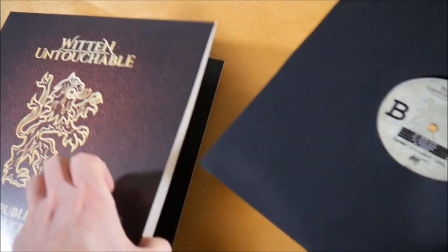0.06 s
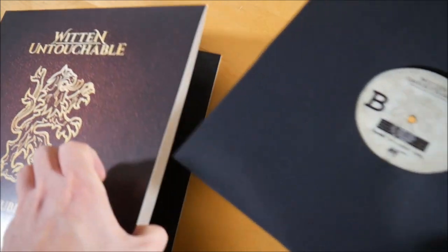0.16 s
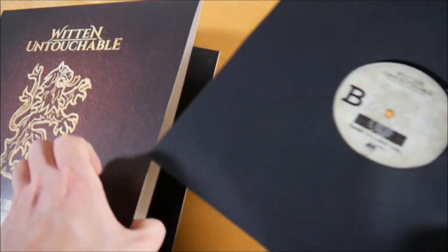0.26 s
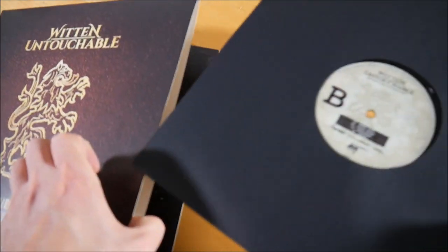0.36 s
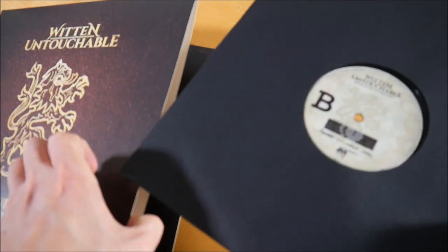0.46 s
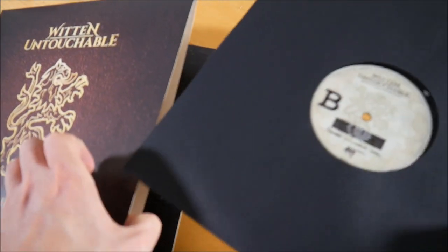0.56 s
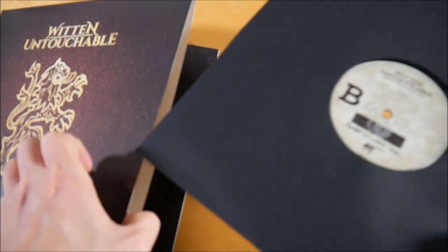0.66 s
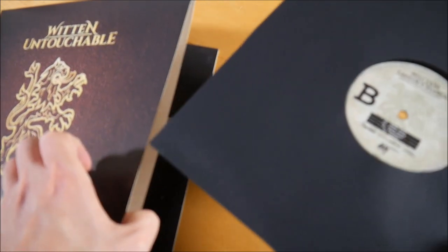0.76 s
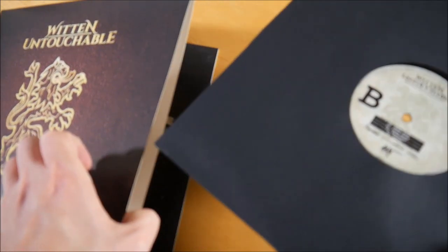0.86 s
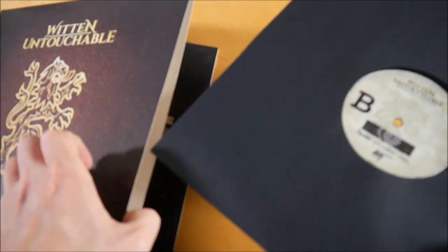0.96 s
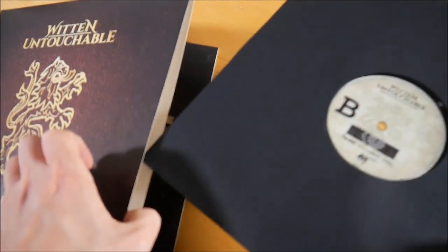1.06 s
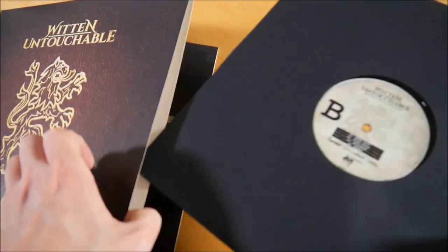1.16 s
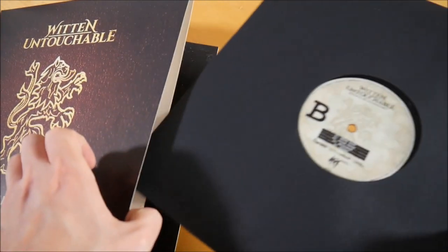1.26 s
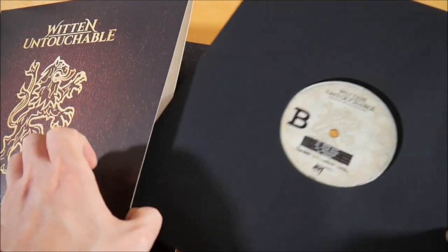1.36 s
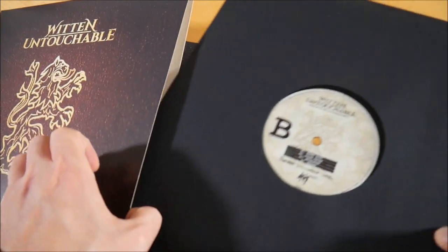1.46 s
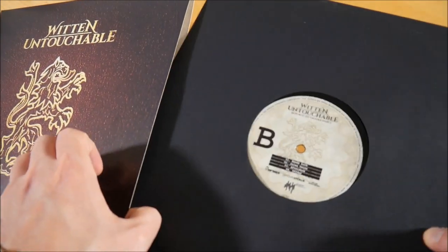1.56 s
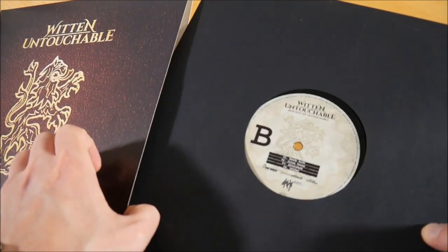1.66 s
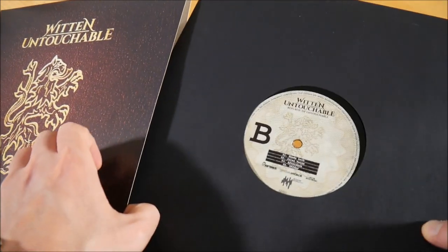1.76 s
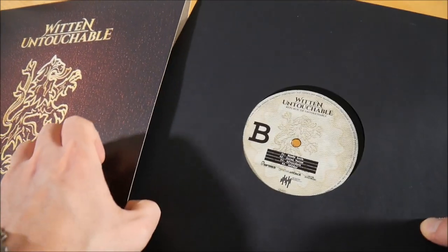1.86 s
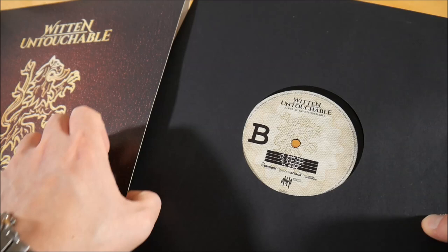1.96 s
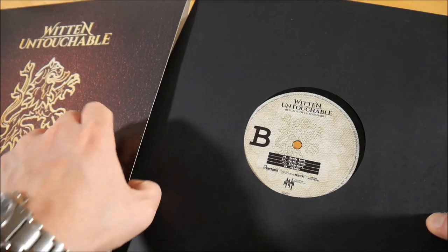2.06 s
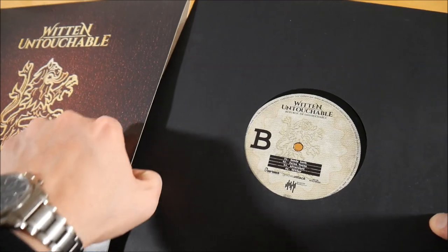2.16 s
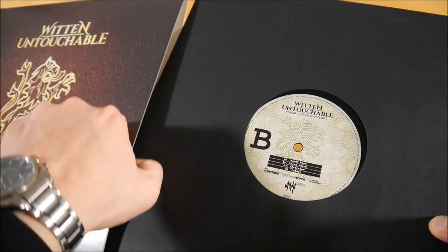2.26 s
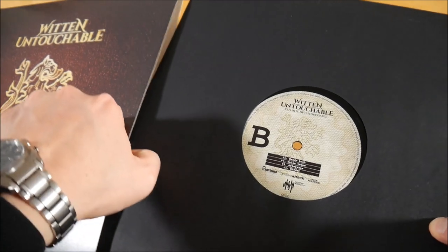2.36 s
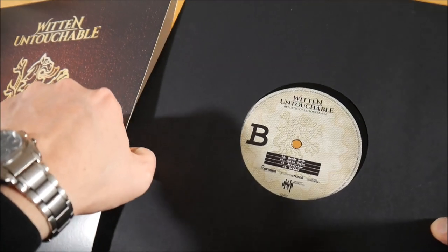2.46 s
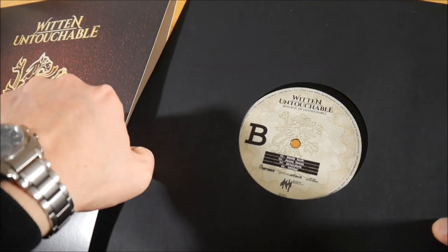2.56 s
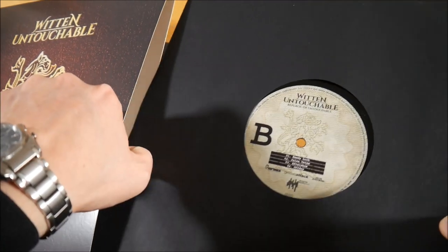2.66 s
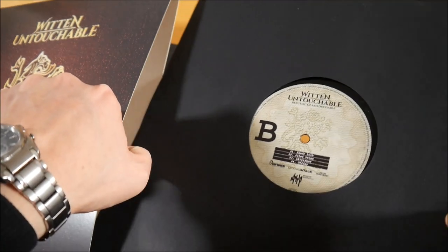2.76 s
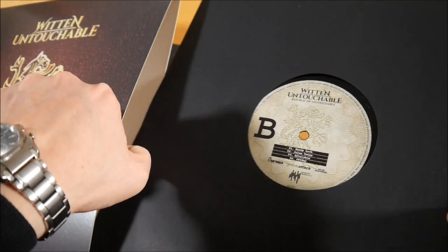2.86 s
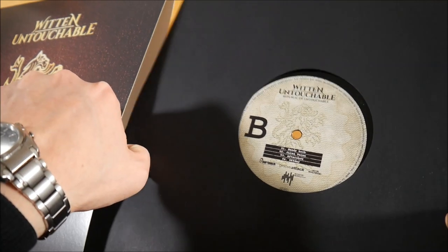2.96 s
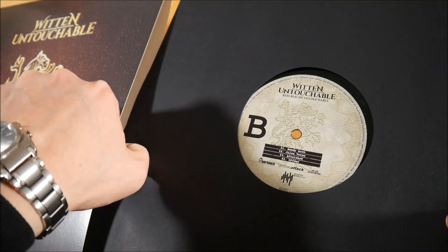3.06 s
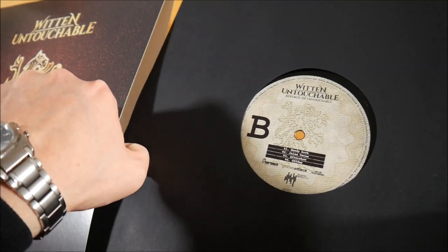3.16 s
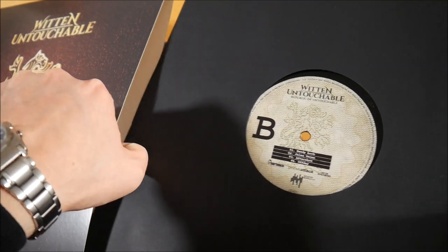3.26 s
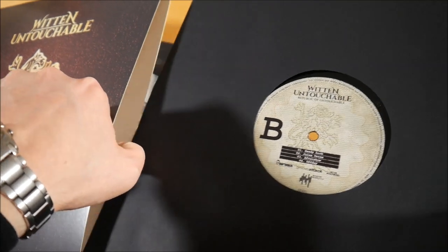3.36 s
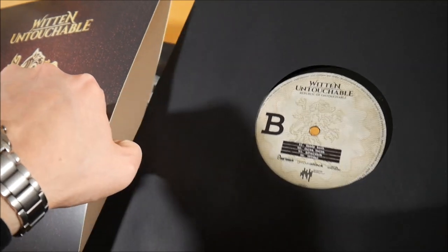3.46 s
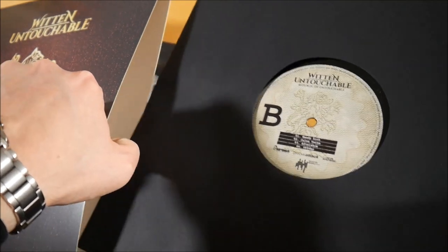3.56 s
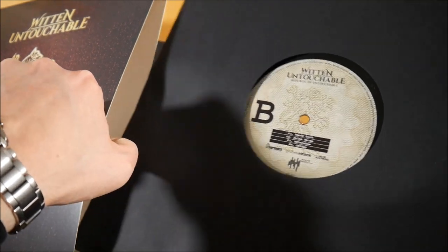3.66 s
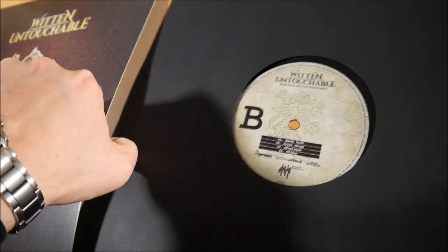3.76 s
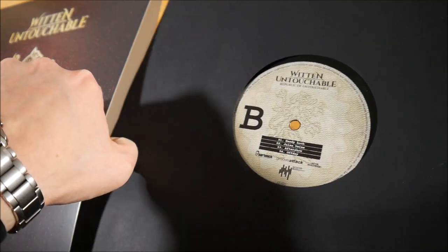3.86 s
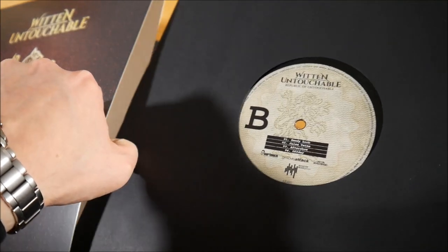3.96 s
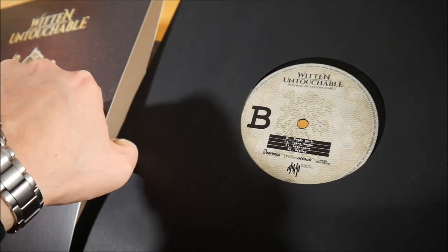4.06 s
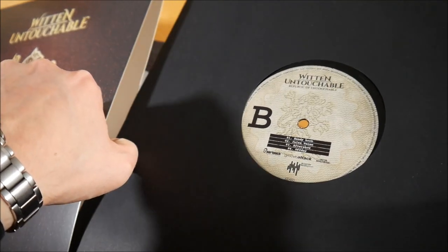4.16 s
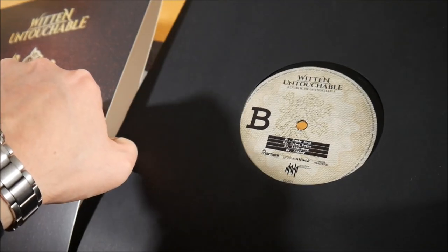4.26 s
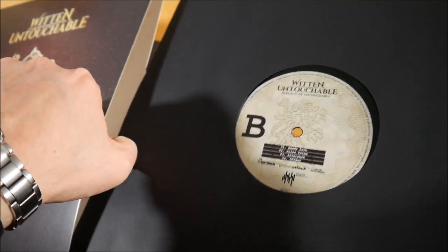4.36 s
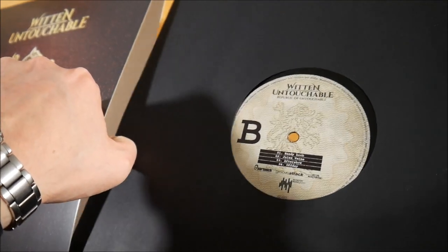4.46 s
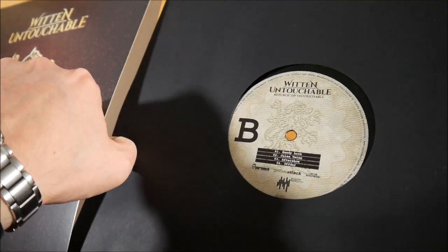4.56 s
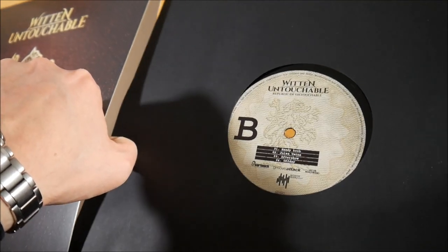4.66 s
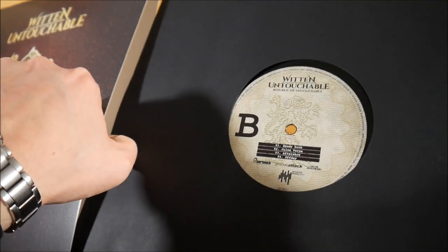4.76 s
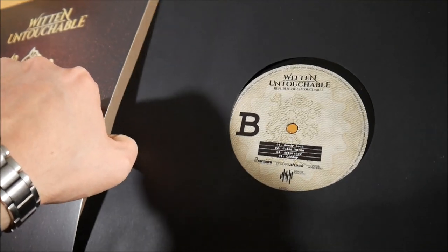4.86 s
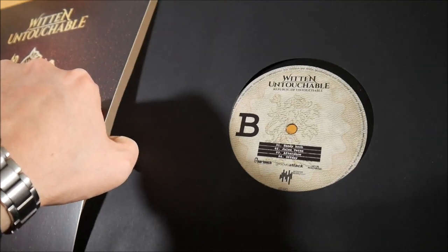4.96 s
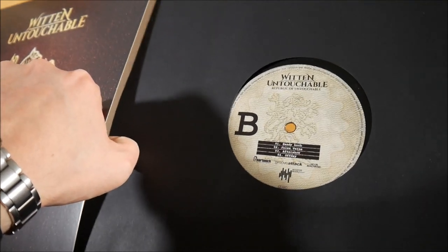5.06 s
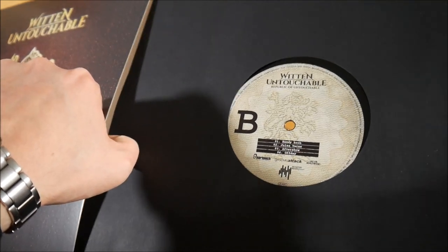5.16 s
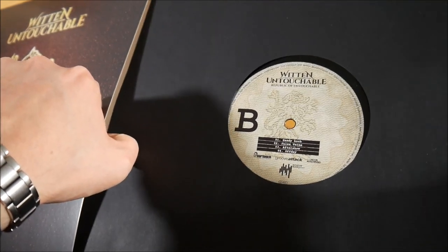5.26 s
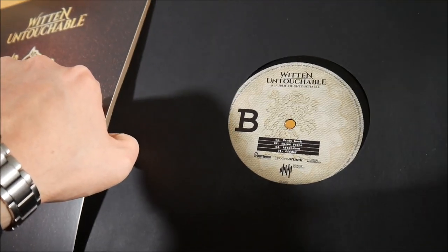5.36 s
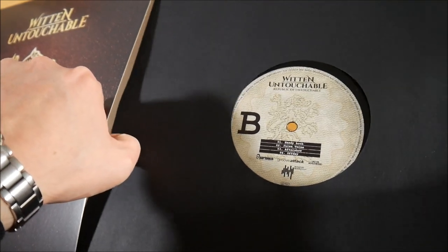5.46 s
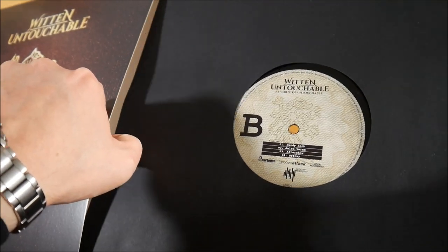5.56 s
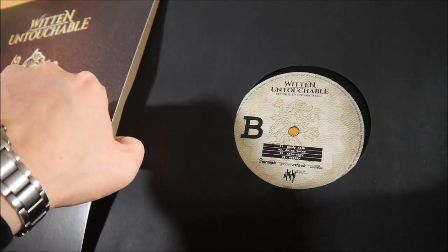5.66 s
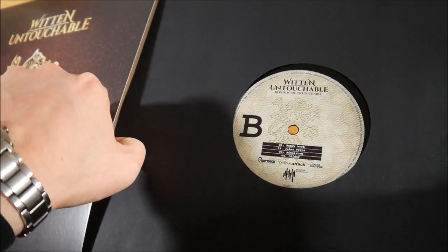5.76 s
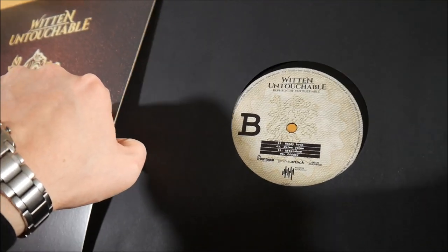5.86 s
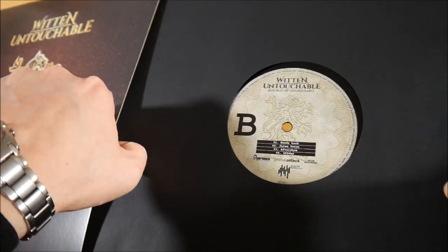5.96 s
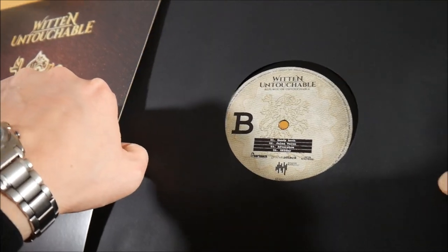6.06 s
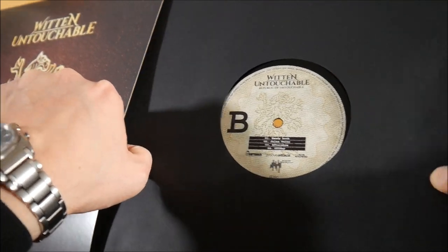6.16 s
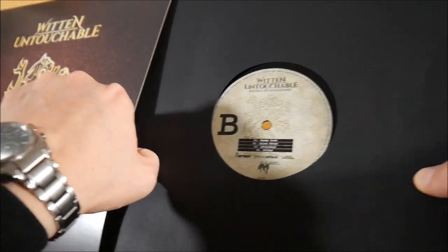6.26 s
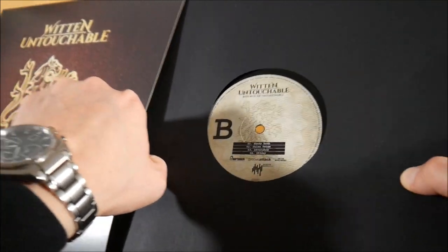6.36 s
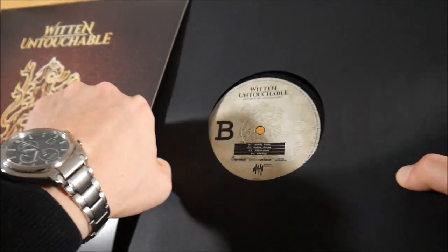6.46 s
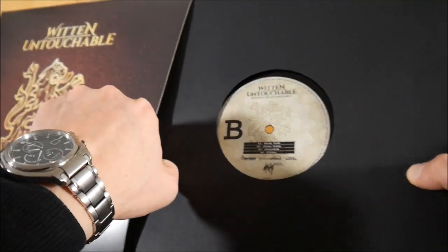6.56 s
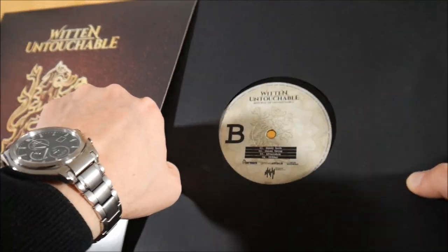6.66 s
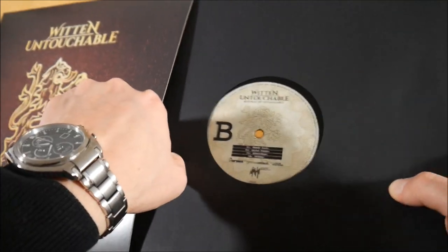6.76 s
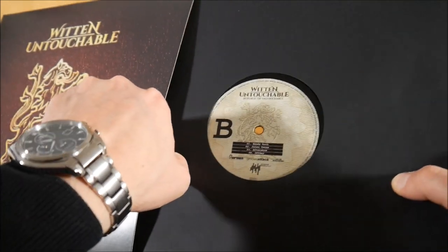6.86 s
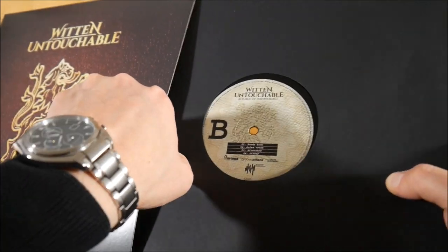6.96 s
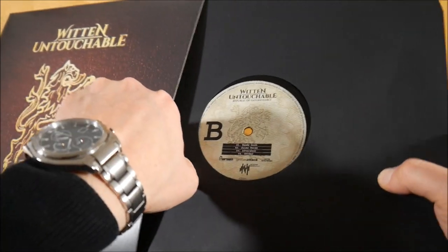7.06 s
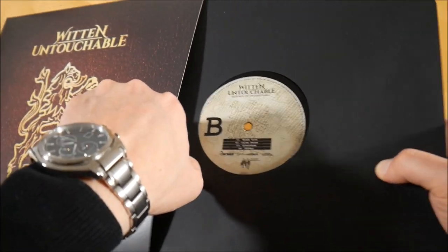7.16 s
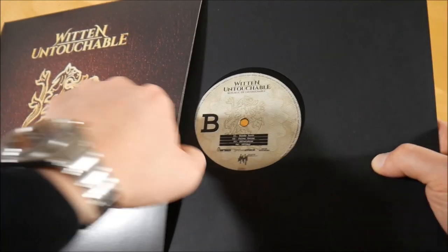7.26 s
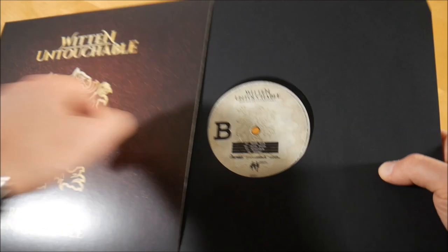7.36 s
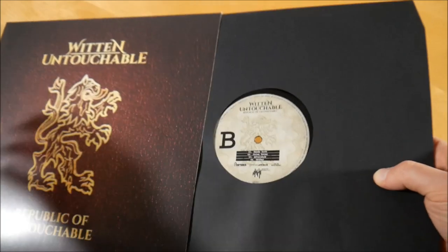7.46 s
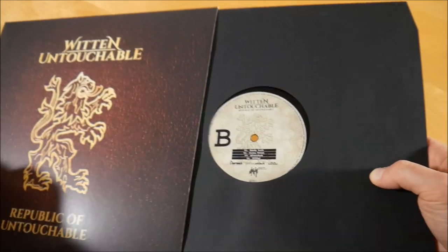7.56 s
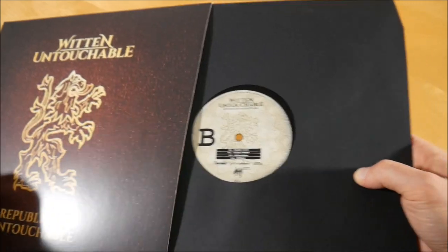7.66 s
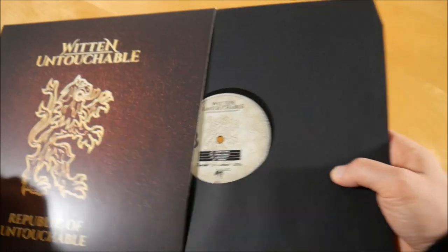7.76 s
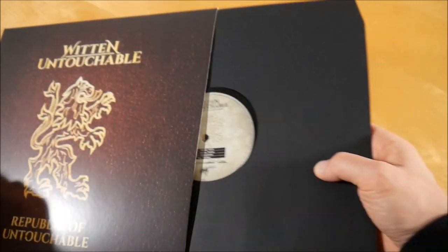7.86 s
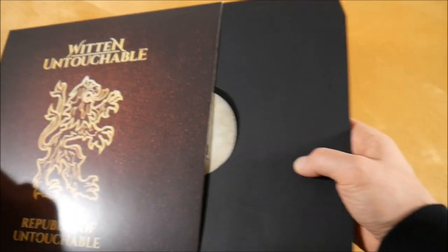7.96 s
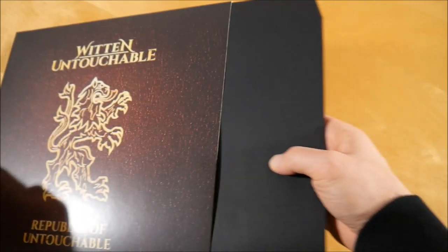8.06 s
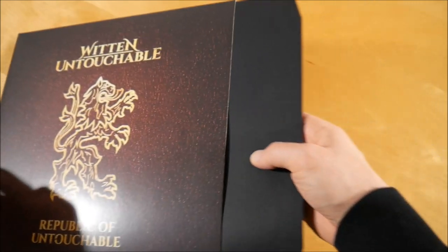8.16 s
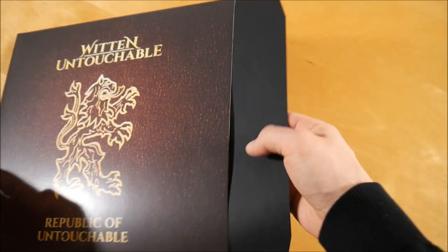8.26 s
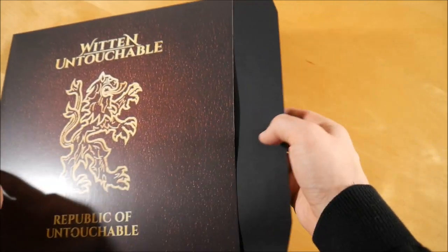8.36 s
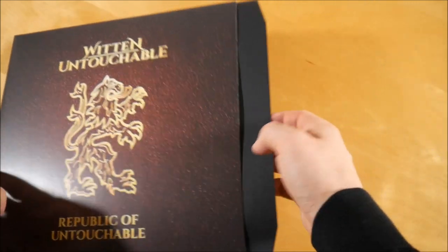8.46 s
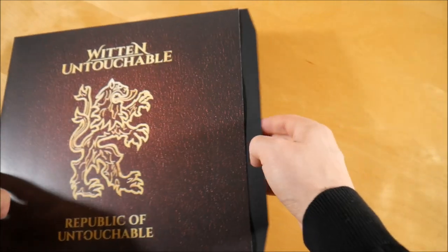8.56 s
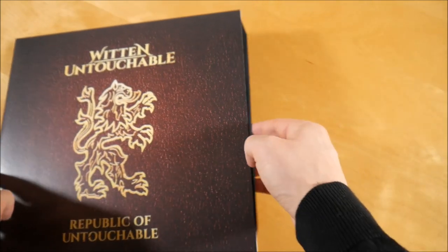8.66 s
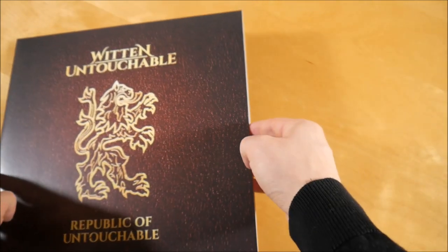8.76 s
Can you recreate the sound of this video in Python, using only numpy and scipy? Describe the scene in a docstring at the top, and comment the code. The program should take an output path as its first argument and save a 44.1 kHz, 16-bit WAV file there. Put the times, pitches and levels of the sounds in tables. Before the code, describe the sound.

Paper scuffs and rustles against cardboard with small taps and ticks, ending in a longer hissing slide as a record slips into its jacket.

```python
"""Paper scuffs in short pushes at the mouth of a cardboard jacket: a record in its inner sleeve is being
worked in on a wooden table. The stiff card knocks and ticks as it is held open, then the sleeve slides
home in one long stroke. Catching fibres make the hiss and drum on the card, the gap adds a hollow note,
creases snap, and knocks ring the jacket and disc. Behind it a small room hums and a tiny mechanism
patters faintly."""
import sys
import numpy as np
from scipy import signal
from scipy.fft import rfft, irfft
from scipy.io import wavfile
from scipy.ndimage import uniform_filter1d

SR = 44100
rng = np.random.default_rng(int(sys.argv[2]) if len(sys.argv) > 2 else 0)


def unload_wav(signal):
    """Save mono or channel-first audio to the path in sys.argv[1] as 16-bit WAV at rate SR, clipped to [-1, 1]."""
    wavfile.write(
        sys.argv[1],
        SR,
        np.round(np.clip(np.atleast_2d(signal).T, -1, 1) * 32767).astype(np.int16),
    )


N = 388080


def gain_of(db):
    """Decibels to amplitude."""
    return 10 ** (np.asarray(db) / 20)


def unit_rms(x):
    """Scales a signal to rms 1."""
    return x / np.sqrt(np.mean(x ** 2) + 1e-20)


def curve_at(points, hz):
    """Reads a curve of (Hz, value) points on a log-frequency axis."""
    f, value = np.transpose(points)
    return np.interp(np.log(hz + 1), np.log(f + 1), value)


def follow(rows, t):
    """Reads each column of an automation curve at times t."""
    times, *columns = np.transpose(rows)
    return [np.interp(t, times, column) for column in columns]


def add(mix, start_s, sound):
    """Mixes a sound in at its start time."""
    part = mix[round(start_s * SR):][:len(sound)]
    part += sound[:len(part)]


def coloured(x, points):
    """Filters by an EQ curve, to rms 1."""
    return unit_rms(irfft(rfft(x) * gain_of(curve_at(points, np.fft.rfftfreq(N, 1 / SR))), N))


def sharpest_pulse(gain):
    """The minimum-phase pulse with this spectral shape."""
    log_gain = np.log(np.maximum(gain / gain.max(), 1e-5))
    mirrored = np.concatenate([log_gain, log_gain[-2:0:-1]])
    return np.fft.ifft(np.exp(np.conj(signal.hilbert(mirrored)))).real


def wander(per_s):
    """A random drift of rms 1 that takes a new heading per_s times a second."""
    knots = rng.standard_normal(8192)
    return unit_rms(np.interp(np.arange(N) / SR * per_s, np.arange(len(knots)), knots))


def hand_motion(t):
    """Pushes, then the slide home. Returns hiss dB, drumming dB, treble tilt, note Hz and note lift dB."""
    # The hand's pushes. Each row: start, rise and length in seconds; hiss, swell over the push and
    # drumming in dB; treble tilt in dB per octave; the gap's note in Hz; its lift in dB.
    pushes = [(0, 0.0012, 0.3, -61, -2, -67, -1, 2240, 1.5),
              (0.475, 0.0036, 0.062, -43.5, 0, -50, 1.5, 3600, 1.5),
              (0.574, 0.045, 0.023, -46, 4.5, -54, 1.8, 3950, 2),
              (1.238, 0.0088, 0.056, -45.5, -3.5, -61.5, -2, 3900, 3.5),
              (1.354, 0.0067, 0.059, -41, -3, -58.5, 0, 4450, 9),
              (1.396, 0.012, 0.1, -37.5, 1, -57, -1, 4940, 2.5),
              (1.496, 0.038, 0.088, -40.5, 2, -52.5, -2, 2660, 6.5),
              (1.593, 0.038, 0.053, -36.5, 2, -42, -1, 2480, 4),
              (1.901, 0.12, 0.35, -47.5, -4, -49.5, 0.5, 2530, 2),
              (2.266, 0.034, 0.14, -60, 4, -67, 1.5, 2900, 1.5),
              (2.691, 0.045, 0.076, -45, 2, -45, -1, 2770, 3),
              (2.775, .03, 0.19, -52, -3.5, -57, -1, 2920, 1.5),
              (2.965, 0.038, 0.11, -47, -6, -57, -0.5, 3100, 1),
              (3.26, 0.012, 0.18, -50.5, 12.5, -53.5, 0.5, 2670, 4.5),
              (3.507, 0.11, 0.14, -42.5, 3.5, -54, 0.5, 3400, 7),
              (3.658, 0.13, 0.22, -44, -7.5, -47.5, -0.5, 3200, 5),
              (3.934, 0.08, 0.13, -50, -7.5, -52.5, -0.5, 4050, 4.5),
              (4.359, 0.079, 0.18, -49.5, -10, -54, 0.5, 4120, 3.5),
              (5.769, 0.004, 0.018, -54.5, -11, -56, -2, 4100, 0),
              (5.979, 0.0066, 0.12, -46.5, 2.5, -54.5, 2.5, 3400, 6.5),
              (6.094, 0.028, 0.16, -45.5, 0, -46, -1.5, 4000, 6.5),
              (6.226, 0.066, 0.19, -38.5, -0.5, -48.5, -1, 4040, 9),
              (6.436, 0.021, 0.023, -40.5, 0, -47.5, -1.5, 2680, 3),
              (6.497, 0.018, 0.055, -58, -4, -51, -3, 3400, 7),
              (6.589, 0.012, 0.072, -52, 5.5, -44.5, -3, 4000, -5),
              (6.786, 0.0045, 0.08, -43, 7, -49.5, -1.5, 4030, 5.5),
              (6.922, 0.072, 0.26, -44.5, 7, -51, -2, 4070, 4),
              (7.218, 0.062, 0.083, -39, 1.5, -53, -2, 4000, 8),
              (7.3, 0.011, 0.16, -50.5, -10, -50.5, -1.5, 4100, -6),
              (7.507, 0.0023, 0.026, -36.5, -10.5, -35, -5, 4300, 4),
              (7.624, 0.15, 0.27, -41, 11, -53, -0.5, 4060, 3.5)]
    # The long slide. Each row: time in seconds, hiss in dB, drumming in dB, treble tilt in dB per
    # octave, lift of the pocket's note in dB.
    slide = [(7.9, -45, -57, -2.5, -1), (8.02, -42, -52, 1, 4), (8.08, -35, -52, 3, 10),
             (8.13, -35.5, -59, 0, 1), (8.27, -33.5, -53, 2, 7.5), (8.35, -38.5, -45.5, -3.5, -2),
             (8.44, -46, -60, -1.5, 11), (8.56, -36.5, -49, -0.5, 0.5), (8.63, -41.5, -54, -1.2, 8.5),
             (8.69, -38.5, -54, -0.4, 0), (8.8, -38, -49, -5.5, -2)]
    release_db_per_s = 255
    pocket_start_hz, air_column_growth_per_s = 2040, 0.61
    hold_hiss_db, hold_drum_db = -70, -68
    strokes = []
    for start, rise, length, hiss_db, swell_db, drum_db, tilt, note_hz, lift_db in pushes:
        age = t - start
        shape_db = 20 * np.log10(np.clip(age / rise, 1e-5, 1))
        shape_db += swell_db * (np.clip(age / length, 0, 1) - .5)
        shape_db -= release_db_per_s * np.maximum(age - length, 0)
        strokes.append((hiss_db + shape_db, drum_db + shape_db, tilt, note_hz, lift_db))
    age = t - slide[0][0]
    hiss_db, drum_db, tilt, lift_db = follow(slide, t)
    gate_db = np.where(age > 0, 0, -np.inf)
    sinking_hz = pocket_start_hz / (1 + air_column_growth_per_s * np.maximum(age, 0))
    strokes.append((hiss_db + gate_db, drum_db + gate_db, tilt, sinking_hz, lift_db))
    hiss_dbs, drum_dbs, *colours = zip(*strokes)
    holding = (t > 1.7) & (t < 7.9)  # between pushes the fingers keep working the mouth open
    powers = [gain_of(db) ** 2 + 1e-14 for db in hiss_dbs]
    paper = sum(powers) + holding * gain_of(hold_hiss_db) ** 2
    card = sum(gain_of(db) ** 2 for db in drum_dbs) + holding * gain_of(hold_drum_db) ** 2 + 1e-14
    # The loudest stroke has most say in the tilt and the note.
    blended = [sum(p * value for p, value in zip(powers, column)) / sum(powers) for column in colours]
    return [10 * np.log10(paper), 10 * np.log10(card)] + blended


def fibre_slips(per_s, spread_db, width):
    """Fibres catch and let go: dense clicks, a few much larger than the rest, panned across the sheet."""
    at = np.flatnonzero(rng.random(N) < per_s / SR)
    size = gain_of(spread_db * np.minimum(rng.exponential(1, N)[at], 6))
    polarity = np.sign(rng.standard_normal(N)[at])
    pan = width * rng.standard_normal(N)[at]
    clicks = np.zeros((2, N))
    clicks[:, at] = size * polarity * (1 + np.outer([1, -1], pan))
    return unit_rms(clicks)


def paper_hiss(hiss_db, speed_tilt=0.063, note_waver=.03, patchy_db=2.5):
    """Fine slips coloured by the part that rubs; the gap adds a note that wavers as the paper flexes."""
    # Colours of the rubbing sleeve. Each row: frequency in Hz, level in dB.
    corner = [(410, -16), (700, -14), (1200, -14.5), (2200, -4.5), (4000, -5), (5800, -5.5), (7500, -6),
              (12000, -9), (15500, -20)]  # its corner drags over the card
    edge = [(410, -44), (700, -1), (955, -1), (1390, -4), (2590, -2.5), (3070, -5.5), (5150, -8),
            (7800, -10.5), (10600, -11.5), (14300, -21.5), (15500, -43)]  # its edge noses about the opening
    lip = [(410, -38), (700, -5), (1000, -11.5), (1450, -6.5), (2800, -4.5), (3250, -5), (4150, -2.5),
           (4800, -5.5), (6800, -6), (10200, -9), (12600, -11.5), (15500, -25)]  # its face passes the jacket's lip
    pocket = [(410, -30), (700, -2), (1150, -8), (1500, -3), (2660, -4.5), (6420, -10.5), (10100, -11.5),
              (14500, -20.5), (15500, -32)]  # it slides deep in the pocket
    # What rubs when. Each row: time in seconds, part (0 corner, 1 edge, 2 lip, 3 pocket).
    contacts = [(1, 1), (1.2, 0), (1.75, 0), (1.9, 1), (5.5, 1), (5.8, 2), (7.88, 2), (8.1, 3)]
    # The note's upward spread for each of those four parts, as a share of its pitch.
    upper_flanks = [.25, .45, .07, .2]
    lower_flank = .07
    hz, t, spectrum = signal.stft(fibre_slips(per_s=18000, spread_db=2.5, width=0.16), SR, nperseg=512)
    part, = follow(contacts, t)
    _, _, tilt, note_hz, lift_db = hand_motion(t)
    eq_db = sum(np.outer(curve_at(colour, hz), np.maximum(1 - abs(part - k), 0))
                for k, colour in enumerate([corner, edge, lip, pocket]))
    # Faster strokes are brighter.
    speed_db = np.interp(t, np.arange(N) / SR, hiss_db - hiss_db.max())
    eq_db += np.log2(np.maximum(hz, 1000) / 4000)[:, None] * (tilt + speed_tilt * (speed_db + 19.5))
    flex = np.interp(t, np.arange(N) / SR, wander(per_s=22))
    off_note = hz[:, None] / (note_hz * (1 + note_waver * flex)) - 1
    note_width = np.where(off_note < 0, lower_flank, np.interp(part, np.arange(4), upper_flanks))
    eq_db += lift_db * np.exp(-.5 * (off_note / note_width) ** 2)
    # The contact wanders over the sheet, so its small resonances shift.
    patches = uniform_filter1d(rng.standard_normal(eq_db.shape), size=6, axis=0)
    eq_db += patchy_db * unit_rms(uniform_filter1d(patches, size=6, axis=1))
    gain = gain_of(eq_db)
    gain /= np.sqrt(np.mean(gain ** 2, axis=0))
    hiss = signal.istft(spectrum * gain, SR, nperseg=512)[1][:, :N]
    return unit_rms(hiss) * gain_of(hiss_db + 1.02 * wander(per_s=78))


def sleeve_rubbing(paper_db=0.3, card_db=-3.0):
    """Fine slips hiss in the paper; coarser ones drum on the card."""
    # The card's body under the rubbing. Each row: frequency in Hz, level in dB.
    card_colour = [(150, -58), (250, -1), (303, -1), (354, 1), (441, 3), (522, 1), (860, -12.5),
                   (1000, -10), (1300, -53), (2200, -120)]
    t = np.arange(0, N / SR, .001)
    hiss_db, drum_db = (np.interp(np.arange(N) / SR, t, db) for db in hand_motion(t)[:2])
    drumming = coloured(fibre_slips(per_s=1100, spread_db=2.5, width=0.063), card_colour)
    drumming *= gain_of(drum_db + 2.2 * wander(per_s=60))
    return gain_of(paper_db) * paper_hiss(hiss_db) + gain_of(card_db) * drumming


def hum_tone(hz, width_hz):
    """A wavering tone: noise in one narrow resonance."""
    off_centre = (np.fft.rfftfreq(N, 1 / SR) - hz) / width_hz * 2
    return unit_rms(irfft(rfft(rng.standard_normal(N)) / (1 + off_centre ** 4), N))


def room_tone(air_db=-61.5, side_db=-5):
    """Still air, a wavering hum and a deep drone that comes and goes."""
    # The still room's colour. Each row: frequency in Hz, level in dB.
    air_colour = [(20, -65), (60, -19.5), (105, -11), (170, -7), (330, -15), (600, -19.5), (1000, -18),
                  (2500, -27), (7900, -32.5), (15500, -29.5)]
    # The hum's tones. Each row: pitch in Hz, width in Hz, base level in dB.
    hum_tones = [(116, 27, -75), (212.9, 27, -61.5), (283, 18, -72)]
    # The low end's ebb and flow. Each row: time in seconds, drone level in dB, change of the hum in dB.
    low_swells = [(0, -74, 1.5), (.9, -67, 3), (1.3, -95, 2.5), (3, -75, 2), (3.25, -103, 3),
                  (8.8, -104, -8)]
    drone_db, hum_db = follow(low_swells, np.arange(N) / SR)
    mid, side = coloured(rng.standard_normal((2, N)), air_colour)
    air = gain_of(air_db + 0.071 * hum_db) * (mid + np.outer([1, -1], gain_of(side_db) * side))
    hum = gain_of(hum_db) * sum(gain_of(db) * hum_tone(hz, width) for hz, width, db in hum_tones)
    drone_hz = 39 + 0.74 * wander(per_s=7.3)
    drone = gain_of(drone_db) * np.sin(2 * np.pi * np.cumsum(drone_hz) / SR)
    return air + hum + drone


def mechanism_patter(level_db=-68, per_s=25, first_s=.02):
    """Evenly spaced clicks of uneven strength faintly ring a small mechanism close by."""
    # The mechanism's modes. Each row: pitch in Hz, width in Hz, relative level in dB.
    mechanism_modes = [(726, 57, -3.5), (897, 36, -12.5)]
    clicks, t = np.zeros(N), np.arange(2048) / SR
    at = (np.arange(first_s, N / SR, 1 / per_s) * SR).astype(int)
    clicks[at] = gain_of(7.0 * rng.uniform(-1.3, 1, len(at)))
    ring = sum(gain_of(db) * np.exp(-np.pi * width * t) * np.sin(2 * np.pi * hz * t)
               for hz, width, db in mechanism_modes)
    return gain_of(level_db) * unit_rms(signal.oaconvolve(clicks, ring)[:N])


def chatter(t, decay_s, rattle):
    """One contact, then a dying run of small ones; rattle weighs the whole run against the first."""
    run = rng.standard_normal(len(t)) * (rng.random(len(t)) < .15) * np.exp(-t / max(decay_s, 1e-4))
    return (t == 0) + rattle * run / (np.linalg.norm(run) + 1e-9)


def crease_ticks(spread_octaves=0.72, hollow_below_hz=3400):
    """Paper creases snap dryly; the card's edges snap lower and ring in a narrower, hollow band. Two high rows,
    at 3.868 s and 7.2735 s, give the hardest knocks their bright top."""
    # The snaps, with the bright top of the knocks at 3.87 s and 7.27 s. Each row: start in seconds, relative
    # level in dB, centre in Hz.
    snaps = [(0.4777, -50, 3520), (1.861, -38, 1610), (2.0407, -33.5, 4240), (2.615, -44.5, 4620),
             (3.868, -26.5, 8800), (4.476, -35, 11000), (4.5806, -39.5, 9730), (4.754, -38.5, 10800),
             (5.2343, -44.5, 4550), (5.294, -46.5, 9000), (5.4147, -38.5, 5300), (5.553, -36.5, 6100),
             (5.559, -41, 4800), (5.637, -34, 4200), (5.711, -43, 4170), (6.503, -38, 11000),
             (6.604, -29.5, 4100), (6.6133, -29.5, 4700), (6.654, -35.5, 8740), (7.2735, -34, 9000),
             (7.4045, -39, 2070), (7.4405, -35, 4430)]
    out, t, hz = np.zeros(N), np.arange(1024) / SR, np.fft.rfftfreq(1024, 1 / SR) + 1
    for start, db, centre_hz in snaps:
        octaves = spread_octaves * min(centre_hz / hollow_below_hz, 1) ** 2
        ring = sharpest_pulse(1 / (1 + (np.log2(hz / centre_hz) / octaves) ** 2))
        snap = signal.fftconvolve(chatter(t, decay_s=0.0026, rattle=1.0), ring)
        add(out, start, 3 * gain_of(db + 5) * snap / np.linalg.norm(snap))
    return out


def jacket_knocks(bend_s=0.00065, grip_detune=.035, loose_s=.0065):
    """Card and disc knock: a bright crack, and a thud that rings their modes around the blow's pitch."""
    # The blows. Each row: start in seconds, thud level in dB, thud centre in Hz, crack level in dB,
    # chatter time in seconds.
    blows = [(1.646,-29,455,-55.5,0.0014), (1.659,-44,426,-44,0.0025), (1.862,-51,576,-51,0.0038),
             (2.04,-41,380,-62,0.0034), (2.203,-41.5,388,-48,0.01), (3.0506,-26.5,536,-43.5,0.0038),
             (3.071,-35,595,-50,0.0046), (3.086,-46,500,-65,0.0025), (3.866,-23,540,-29.5,0.0019),
             (3.879,-35,380,-50,0.013), (4.111,-46.5,380,-46,0.0069), (4.371,-50.5,546,-51.5,0.0028),
             (4.462,-45,303,-53,0.0053), (4.566,-47.5,423,-62,0.022), (4.635,-45,356,-62,0.0045),
             (4.726,-46,380,-54,0.0099), (4.863,-43.5,430,-48,0.0059), (5.155,-40,443,-52,0.0063),
             (5.213,-44.5,450,-66,0.0027), (5.301,-47,346,-69,0.021), (5.439,-51,415,-52.5,0.0055),
             (5.549,-50,800,-52,0.0042), (5.577,-43.5,380,-63,0.0096), (5.635,-38.5,430,-62,0.0065),
             (5.647,-39.5,446,-61,0.0036), (5.889,-45,413,-53.5,0.0072), (6.739,-43,422,-52,0.022),
             (7.159,-38,460,-61,0.0011), (7.273,-30.5,610,-34.5,0.0018), (7.365,-40,330,-43.5,0.016),
             (7.424,-40.5,560,-56,0.0075), (7.49,-38.5,650,-42,0.012), (7.497,-30,610,-50,0.0034),
             (7.5093,-32,510,-34,0.0062), (7.687,-34.5,510,-46.5,0.018), (7.703,-42,156,-43,0.024),
             (7.754,-32,680,-32,0.0035), (7.893,-39.5,510,-32,0.011), (7.956,-45,760,-54,0.0033),
             (8.342,-41.5,710,-39,0.012), (8.407,-35.5,500,-53,0.016)]
    # A cushioned blow has little crack and a narrower ring. Each row: thud over crack in dB,
    # spread of the thud in octaves.
    cushioning = [(16, 0.69), (26, 0.27)]
    # Modes of jacket and disc on the table. Each row: pitch in Hz, width in Hz, level in dB.
    board_modes = [(146, 120, 6), (283, 88, 5), (380, 72, 0), (455, 31, -4), (510, 57, -1.5),
                   (688, 210, 0.5), (895, 160, 1), (1154, 32, 1.5)]
    # The crack's colour. Each row: frequency in Hz, level in dB.
    crack_colour = [(600, -16.5), (1500, 11), (2200, 8.5), (3500, 3), (5200, 1), (7500, -6), (11000, -3),
                    (15500, -20)]
    out, t, hz = np.zeros(N), np.arange(4096) / SR, np.fft.rfftfreq(4096, 1 / SR) + 1
    bending = np.exp(-4j * np.pi * bend_s * np.sqrt(500 * hz))  # bending waves bring the treble first
    snap = sharpest_pulse(gain_of(curve_at(crack_colour, hz)))
    scale = np.sqrt(SR / 100)  # each sound has the energy of 10 ms at its level
    grips = 1 + grip_detune * rng.uniform(-1.14, 1, len(blows))  # the changing grip shifts the modes
    for (start, thud_db, centre_hz, crack_db, chatter_s), grip in zip(blows, grips):
        board = np.sqrt(sum(gain_of(db) ** 2 / (1 + ((hz - mode_hz * grip) / width * 2) ** 2)
                            for mode_hz, width, db in board_modes))
        octaves = np.interp(thud_db - crack_db, *np.transpose(cushioning))
        band = 1 / (1 + (np.log2(hz / centre_hz) / octaves) ** 2)
        blow = band / (1 + (85 / hz) ** 3) / (1 + (hz / centre_hz / 3.4) ** 4)  # low and high cut
        ring = irfft(rfft(sharpest_pulse(board * blow)) * bending)
        looseness = chatter_s ** 2 / (chatter_s ** 2 + loose_s ** 2)  # long contacts rattle more
        thud = signal.fftconvolve(chatter(t, chatter_s, rattle=5.1 * looseness), ring)
        crack = signal.fftconvolve(chatter(t, 1.44 * chatter_s, rattle=26.0), snap)
        add(out, start, scale * gain_of(thud_db) * thud / np.linalg.norm(thud))
        add(out, start, scale * gain_of(crack_db) * crack / np.linalg.norm(crack))
    return out


def small_room(x, wet_db, width_db):
    """Direct sound, echoes off nearby surfaces, and a short tail that differs a little in each ear."""
    # Early reflections. Each row: delay in seconds, level in dB before softening.
    reflections = [(.0046, -19), (0.0124, -14.5), (0.0202, -19)]
    # The tail's length. Each row: frequency in Hz, seconds to fall by 60 dB.
    decay_times = [(150, 0.34), (500, 0.16), (1200, 0.25), (2500, 0.062), (15000, 0.25)]
    t = np.arange(SR // 2) / SR
    taps = rng.choice([-1., 1.], (2, len(t))) * (rng.random((2, len(t))) < .1) * (t > .006)
    hz, frame_s, spectrum = signal.stft(taps, SR, nperseg=256)
    decay = gain_of(-60 * frame_s / curve_at(decay_times, hz)[:, None])
    mid, side = signal.istft(spectrum * decay, SR, nperseg=256)[1][:, :len(t)]
    tail = mid + np.outer([1, -1], gain_of(width_db) * side)
    response = gain_of(wet_db) * tail / np.linalg.norm(mid)
    response[:, 0] += 1  # direct sound
    soft = signal.windows.hann(15)  # cluttered surfaces return little treble
    for delay, db in reflections:
        for ear in response:
            add(ear, delay, gain_of(db) * soft / soft.sum())
    return signal.oaconvolve(np.atleast_2d(x), response, axes=1)[:, :N]


def scene():
    """Rubbing, knocks and ticks up close, over the room tone and the faint patter."""
    rubbing = small_room(sleeve_rubbing(), wet_db=-10.0, width_db=-17.0)
    impacts = small_room(jacket_knocks() + crease_ticks(), wet_db=-7.5, width_db=-19.0)
    return rubbing + impacts + room_tone() + mechanism_patter()


def record(dry):
    """The microphone pair's width, lean and colour, then a steep high cut."""
    # Stereo width. Each row: frequency in Hz, gain on the side signal in dB.
    side_eq = [(60, -1.5), (250, 7.5), (500, 11), (1000, 8), (4000, 5.5), (12000, 6.5)]
    # The microphone's colour, with a dip in the treble. Each row: frequency in Hz, gain in dB.
    mic_eq = [(20, 2.5), (6800, 0), (7900, -5), (9200, -2), (20000, -10.5)]
    # Stereo lean. Each row: frequency in Hz, left minus right in dB.
    lean_eq = [(250, -0.4), (1000, 1.5), (2200, 0.5), (4500, -1), (8000, 0.8)]
    hz = np.fft.rfftfreq(N, 1 / SR)
    left, right = rfft(dry)
    side = gain_of(curve_at(side_eq, hz)) * (left - right) / 2
    widened = (left + right) / 2 + np.outer([1, -1], side)
    eq_db = curve_at(mic_eq, hz) + np.outer([.5, -.5], curve_at(lean_eq, hz))
    heard = irfft(widened * gain_of(eq_db), N)
    high_cut = signal.firwin(401, cutoff=15700, window=("kaiser", 9), fs=SR)
    return signal.oaconvolve(heard, high_cut[None], "same")


dry = scene()
out = record(dry)
unload_wav(out)
```